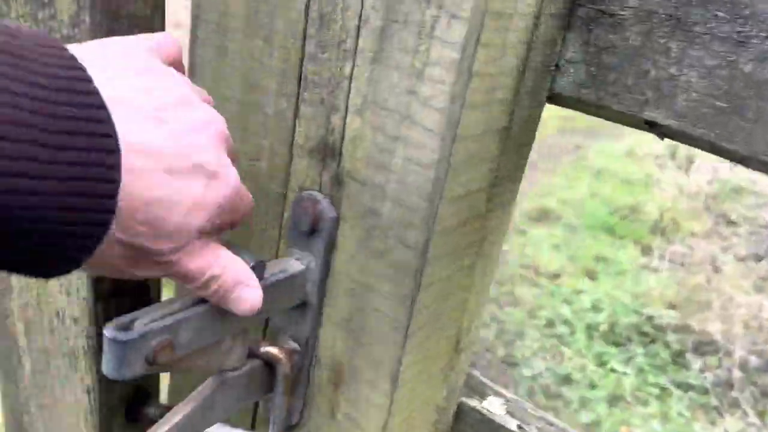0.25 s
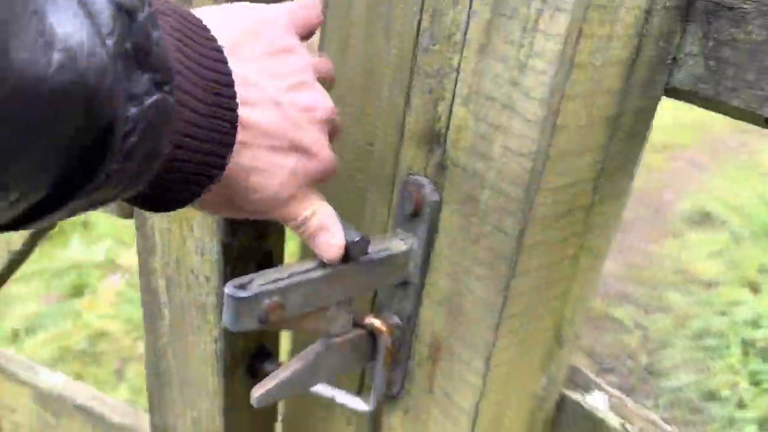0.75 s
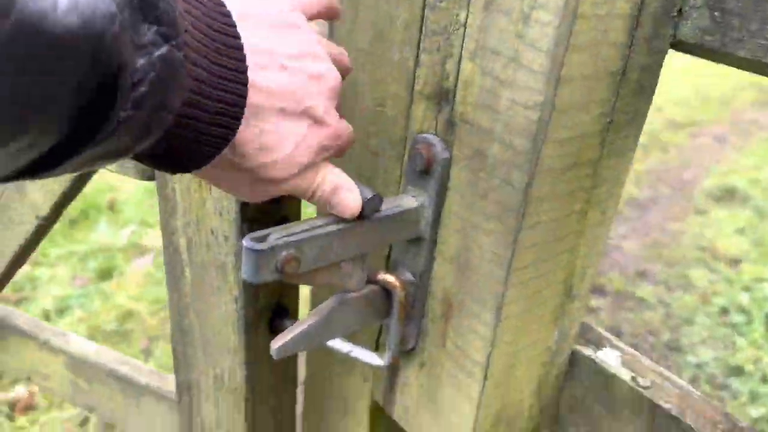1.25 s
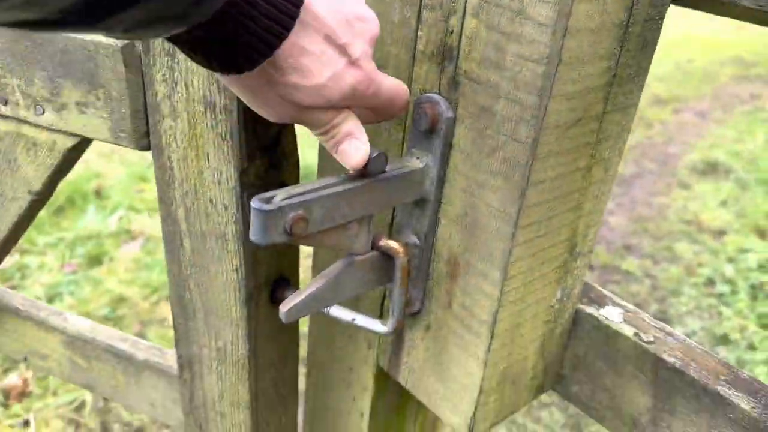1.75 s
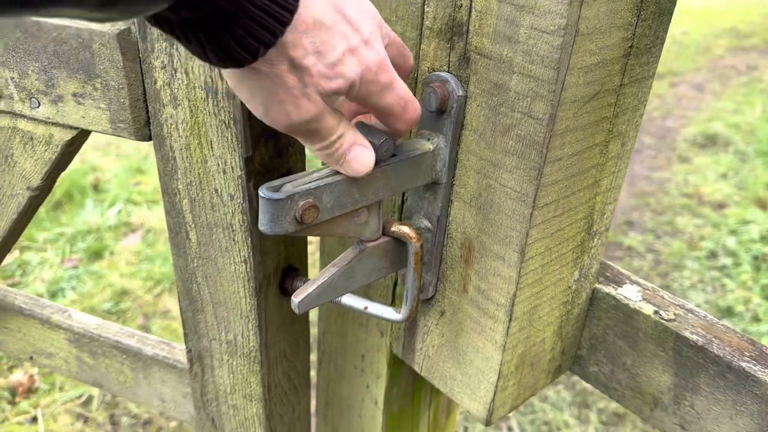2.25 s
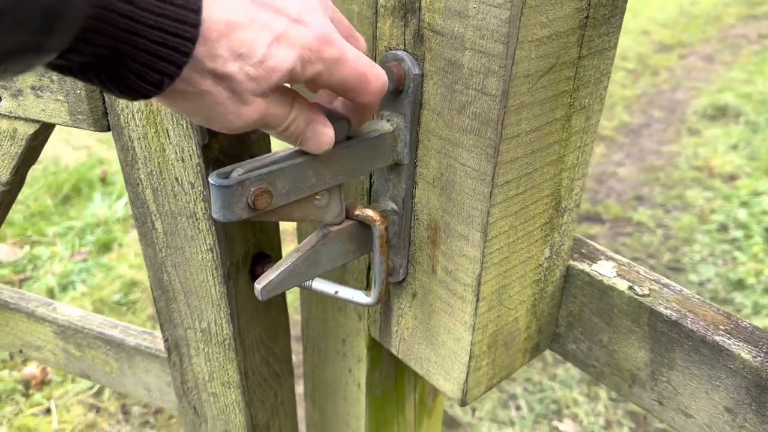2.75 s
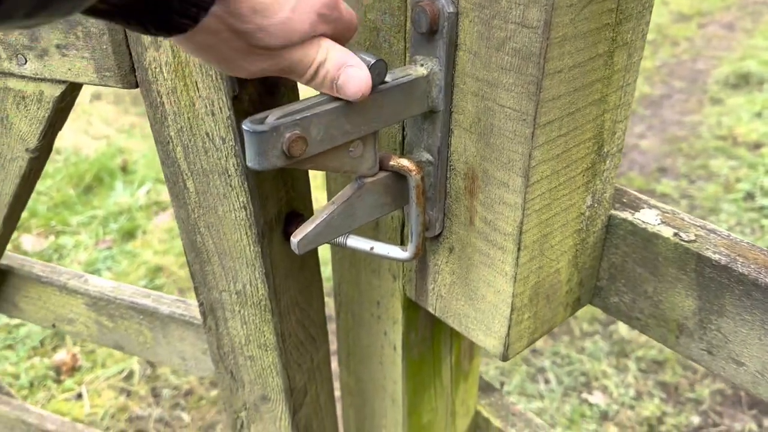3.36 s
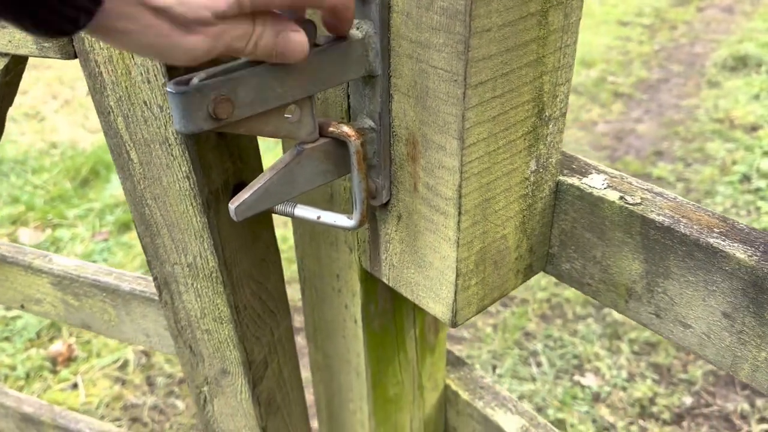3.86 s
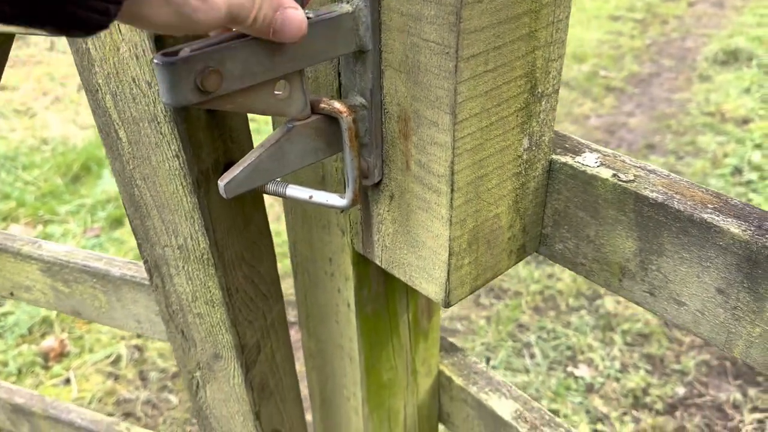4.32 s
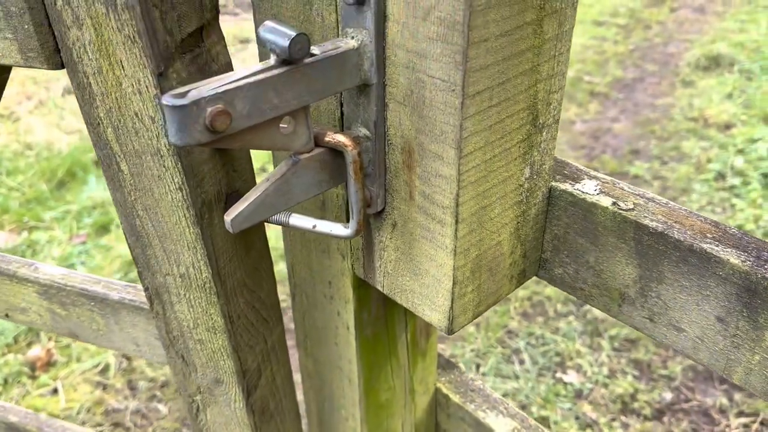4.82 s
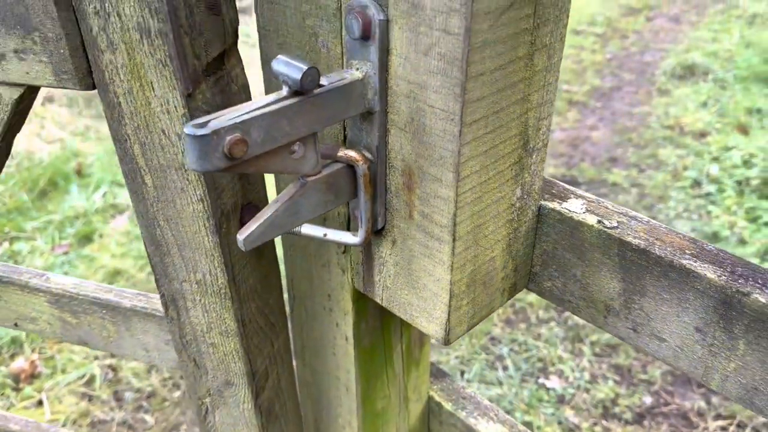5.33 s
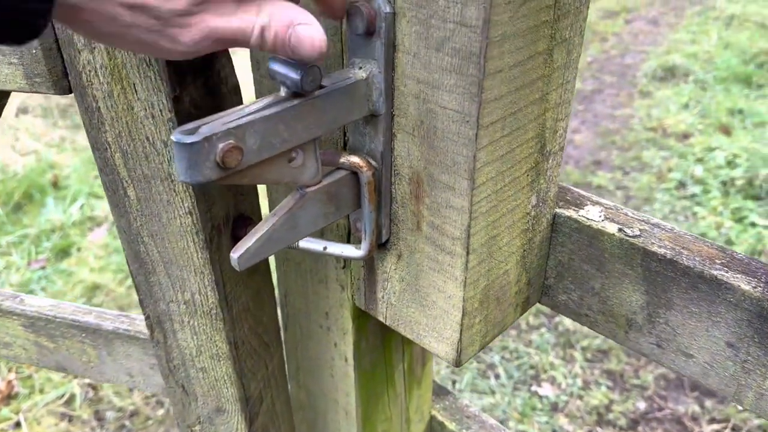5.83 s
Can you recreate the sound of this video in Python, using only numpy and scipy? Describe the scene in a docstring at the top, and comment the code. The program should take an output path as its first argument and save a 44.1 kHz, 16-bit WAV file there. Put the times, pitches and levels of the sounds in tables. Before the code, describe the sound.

A steel latch on a wooden gate is handled close to the microphone in quiet open air. A brief rub and soft knocks come at 0.1-0.3 s, with cloth brushing. After a gap, light ticks from 0.9 s lead to two strong, bright clacks at about 1.2 and 1.3 s. A faint scrape ends in a woody knock at 1.6 s. Clusters of clacks follow at 2.1 and 2.4 s, a hard one at 2.8 s, smaller clicks around 2.9-3.1 s and a ringing clank at 3.3 s. Softer ticks continue, with a pair near 4.0 s and a sharp, bright clack at 4.4 s. Dull low bumps at 4.65 and 4.9 s precede a swelling scrape, and at 5.05-5.25 s the gate shuts with a rapid, ringing rattle. Clicks at 5.7 and 5.8 s and a final firm clack at 6.0 s end it over low rumble and faint rustle.

```python
"""A wooden field gate in the open air, close by, where a hand works the steel latch.
Lever and catch clack as short modes and noise, with longer notes where they ring free; near the end the gate swings
shut and the catch rattles. Steel rubs as band noise pressed harder until it seats, bumps are decaying low sines,
the sleeve is swelling noise, and a lumpy low rumble with a rustle lies behind."""
import sys
import numpy as np
from scipy import signal
from scipy.io import wavfile
from scipy.ndimage import uniform_filter1d

SR = 44100
rng = np.random.default_rng(int(sys.argv[2]) if len(sys.argv) > 2 else 0)


def wrap_up_sound(samples):
    """Save the sound to the file named by the first command line argument, as 16-bit audio."""
    columns = np.atleast_2d(samples).T
    # keep every value between -1 and 1, then stretch to whole-number steps
    tamed = np.clip(columns, -1, 1)
    steps = np.round(tamed * 32767).astype(np.int16)
    wavfile.write(sys.argv[1], SR, steps)


N = 268348
AGE = np.arange(int(.36 * SR)) / SR  # time since a blow [s]
TOP_BAND_HZ = (12000, 16000)

# steel meeting steel: (time [s], clank level [dB], then relative to the clank: thud of the wood [dB],
# hardness of the contact [dB], free ring [dB]; pitch of the struck spot [Hz], strongest note of the free ring [Hz])
BLOWS = [(0.166, -37, -6, -7.5, -35, 1920, 6087), (0.207, -32.5, -1, -26, -30, 1160, 6087),
         (0.32, -43.5, -4, -34, -25, 1580, 6087), (0.937, -44, -9, -14.5, -20, 1270, 3461),
         (1.027, -37.5, -11.5, -25, -16.5, 1380, 3461), (1.141, -50.5, -5, -13, -24, 1270, 6087),
         (1.1717, -18.5, -23, -5, -27, 1360, 6087), (1.27, -20, -19.5, -4.5, -18, 1350, 3461),
         (1.5877, -32.5, 4, -18.5, -18, 720, 3461), (1.8366, -45.5, -0.5, -14.5, -29, 2010, 1061),
         (2.0852, -39.5, 3.5, -1.5, -14, 804, 6087), (2.109, -21.5, -9, -11, -26, 1990, 3461),
         (2.123, -31.5, -5, -22, -11, 2210, 6790), (2.188, -53.5, -4, -26, -15, 1130, 3461),
         (2.4012, -27.5, -8.5, 5, -23, 2570, 9270), (2.431, -21, -3, -7.5, -31, 2100, 1061),
         (2.4715, -32, -11, -17, -24, 2420, 1061), (2.64, -40.5, 4, -15.5, -20, 800, 1061),
         (2.801, -36, -7, -10, -21.5, 1490, 6087), (2.81, -18, -10, -5, -12, 1367, 1061),
         (2.9127, -25.5, -6, -9, -17, 1067, 3461), (2.967, -31, -13, -3.5, -4, 1390, 3461),
         (3.023, -53, 2, -7, -20, 1480, 3461), (3.1268, -26, -5, -20, -13, 800, 4318),
         (3.3024, -20, -7.5, -8, -18, 800, 4318), (3.4101, -32.5, -7.5, -7, -17, 1400, 6087),
         (3.485, -40.5, -4, -16, -27, 1380, 6087), (3.858, -41, 5, -8, -21, 638, 1061),
         (3.968, -29.5, -1.5, -21, -32, 2900, 1061), (3.9709, -26, -10.5, 0, -24, 1390, 6087),
         (4.015, -41, -2, -9, -30, 1410, 1061), (4.1915, -42.5, -2.5, -4, -11, 2650, 3461),
         (4.322, -42.5, 2.5, -6.5, -23, 930, 1061), (4.3919, -18, -25, -2, -18, 2100, 4895),
         (4.4015, -26, -1, -41, -13, 1620, 1061), (4.458, -29, -7, -17.5, -14.5, 1070, 4895),
         (4.513, -50.5, -12, -12, -20, 1420, 6087), (4.8336, -33, -3, -15.5, -26, 843, 1061),
         (5.047, -21, -5, -4, -28, 536, 3461), (5.05, -20.5, -8, -4, -13, 1980, 6087),
         (5.063, -32, -24, -2, 2.5, 1560, 3461), (5.077, -38.5, -3, 3.5, -4, 2140, 6790),
         (5.095, -36, -13, -7, -21, 1380, 3461), (5.115, -30.5, -12, -1, -1, 1400, 4895),
         (5.132, -45, -18, 3.5, 6, 2990, 6087), (5.1552, -29, -2, -6.5, 1, 800, 6087),
         (5.18, -27, -33, -4.5, -6, 1400, 6087), (5.1998, -31, -13, -18, -16, 1970, 3461),
         (5.22, -43, -12, -10.5, -22, 2010, 6790), (5.25, -41, -2, -15, -9, 1890, 6790),
         (5.689, -23, -11, -10.5, -13, 2010, 4895), (5.797, -20, -20.5, -3, -8, 2415, 4895),
         (5.95, -40, -16, -9.5, -22, 1380, 6087), (5.98, -41.5, 7, -25, -18, 790, 1061),
         (5.9942, -18.5, -7.5, -5, -21, 795, 1061)]


def from_db(db):
    """Decibels to gain."""
    return 10 ** (np.asarray(db) / 20)


def rms_one(x):
    """Scale to rms 1."""
    return x / np.sqrt(np.mean(x ** 2) + 1e-20)


def at_hz(points, hz):
    """Read a curve on a log-frequency axis."""
    points_hz, values = np.transpose(points)
    return np.interp(np.log(hz), np.log(points_hz), values)


def in_time(curve):
    """Join the points of a curve by straight lines."""
    return np.interp(np.arange(N) / SR, *np.transpose(curve))


def dying(t60):
    """Exponential decay after a blow, 60 dB down after t60 seconds."""
    return np.exp(-np.log(1000) * AGE / t60)


def rising(rise_s):
    """Vibration takes a moment to spread through the metal and wood."""
    return 1 - np.exp(-(AGE / rise_s) ** 2)


def add(out, s, sound):
    """Mix a sound in at a time in seconds."""
    start = int(s * SR)
    out[:, start:start + sound.shape[-1]] += sound[..., :N - start]


def band_noise(low, high, alike, order=3):
    """Stereo noise in a band with a given left-right correlation; rms 1."""
    sos = signal.butter(order, [low, high], "band", fs=SR, output="sos")
    mid, side = signal.sosfilt(sos, rng.standard_normal((2, N)))
    left_right = np.array([[1], [-1]])
    return rms_one(np.sqrt(1 + alike) * mid + np.sqrt(1 - alike) * side * left_right)


def pad_for_tail(noise):
    """Wrap noise past the end so that the last blows can take a full length of it."""
    return np.pad(noise, ((0, 0), (0, len(AGE))), "wrap")


def drift(per_s):
    """A smooth random wander of rms 1, with per_s new targets a second."""
    knots = rng.standard_normal(1000)
    return rms_one(np.interp(np.arange(N) / SR * per_s, np.arange(len(knots)), knots))


def shaped_noise(spectrum, patchy_db):
    """Half-octave bands of noise, each flickering on its own; rms 1."""
    # likeness of the two channels: (frequency [Hz], correlation)
    likeness = [(40, .3), (100, .35), (250, .55), (1000, .4), (4000, .15), (14000, .3)]
    out = 0
    for low in 20 * 2 ** (np.arange(20) / 2):
        hz = low * 2 ** (1 / 4)  # middle of the band
        if spectrum[0][0] <= hz <= spectrum[-1][0]:
            level_db = at_hz(spectrum, hz) + patchy_db * drift(per_s=51)
            gain = from_db(level_db) * np.sqrt(hz)  # a wider band holds more power
            out = out + gain * band_noise(low, low * np.sqrt(2), at_hz(likeness, hz), order=2)
    return rms_one(out)


def closeness(hz, spot_hz):
    """1 for a mode at the favoured pitch, falling to nearly 0 two semitones away."""
    return np.exp(-(np.log2(hz / spot_hz) / .09) ** 2)


def strike(modes, spot_hz, spot_db=0, even_total=True):
    """One stereo ring per blow: damped modes near a favoured pitch gain level, and no two blows are quite alike."""
    # how far the left channel leads the right: (frequency [Hz], phase [rad])
    lead = [(200, 0), (800, .4), (1060, -1.2), (1380, -2.5), (1750, -.4), (2100, .4), (2760, 1.1),
            (4300, 1.1), (4900, -1.4), (6080, .9), (6800, 1.2), (7800, -1.5), (9000, -1.1), (16000, -.9)]
    hz, level_db, t60, pan_db = np.transpose(modes)
    near = closeness(hz, spot_hz[:, None])
    chance_db = 2.6 * rng.standard_normal(near.shape)
    size = from_db(level_db + spot_db * near + chance_db)
    if even_total:  # the same total power in every blow
        size = size / np.linalg.norm(size, axis=1, keepdims=True)
    size = np.sqrt(2) * size * np.exp(2j * np.pi * rng.random(size.shape))  # random phases
    pan = from_db(np.outer([1, -1], pan_db) / 2)
    phase = np.exp(1j * np.outer([1, -1], at_hz(lead, hz)) / 2)
    waves = np.exp(np.outer(2j * np.pi * hz - np.log(1000) / t60, AGE))
    strengths = (size[:, None] * pan * phase).reshape(-1, len(hz))
    return (strengths @ waves).real.reshape(len(BLOWS), 2, -1)


def chatter(gaps, t60, first_db=-22, loss_db=6):
    """Envelope of a contact and of the ever weaker rebounds of the loose parts, which add in power."""
    touches = np.zeros(len(AGE))
    at = np.minimum(np.cumsum(gaps) * SR, len(AGE) - 1).astype(int)
    touches[at] = from_db(first_db - loss_db * np.arange(len(gaps))) ** 2
    decay_per_sample = dying(t60)[1] ** 2
    rebounds = np.sqrt(signal.lfilter([1], [1, -decay_per_sample], touches + 1e-18))
    return np.hypot(dying(t60), uniform_filter1d(rebounds, size=64))


def clacks(tail_t60=0.2, grain_db=1.5, lead_in_db=-15, lead_in_t60=0.023, grip_t60=0.16, struck_db=2.5, spot_db=13):
    """Each band answers a blow with clear modes, dense scatter and a faint tail from gate and ground; the struck one
    is louder, low ones follow mostly the thud of the wood and high ones the hardness."""
    # parts of a clack: (low edge [Hz], high edge [Hz], relative level [dB], share of the thud, share of the hardness,
    # scatter over clear modes [dB], rise [s], base t60 [s], tail [dB], left-right correlation)
    parts = [(1094, 3000, -1.5, 0.027, 0.013, -0.5, .0007, 0.027, -31, 0.36),
             (224, 560, -8, 0.62, 0.14, -6, 0.0021, 0.14, -17, 0.39),
             (534.9, 1100, -.5, 0.99, 0.051, -7.5, 0.0018, 0.064, -16.5, 0.57),
             (2852, 5500, -3, 0.17, 0.71, 7, 0.0002, .025, -39.5, 0.082),
             (5700, 7140, 1, 0.022, 1.03, -2.5, 0.00072, .027, -34.5, .35),
             (7777, 9430, 2, 0.0098, 1.57, 0.5, 0.00059, 0.031, -44.5, 0.26)]
    # damped modes of latch and post: (frequency [Hz], relative level [dB], t60 before grip [s], left over right [dB])
    body_modes = [(255, 0, .09, 0), (380, -4, .07, -1), (535, -1, .06, 0), (655, -5, .06, -3),
                  (725, -1, .055, -3), (800, 0, .07, -3), (940, -7, .05, -4), (1060, -5, .09, -3),
                  (1255, -4, .06, 1), (1400, -4, .06, 1), (1565, -3, .06, -1), (1820, -3, .05, -1),
                  (2010, -2, .055, -1), (2270, -2, .05, 0), (2560, -4, .04, 0), (2830, -4, .04, 1),
                  (3462, 0, .08, 2), (3800, -5, .04, 3), (4318, -2, .06, 4), (4892, -5, .05, 4),
                  (6080, 0, .055, 6), (6200, -9, .035, 4), (6830, -11, .055, 2), (7790, -6, .045, 1),
                  (8300, -8, .025, 1), (9010, 0, .036, 0), (9280, -6, .04, 0)]
    rebounds, rebound_s = 3, 0.0076  # touches after each blow, mean gap
    mean_blow_db, longer_per_db = -27.5, 0.0011  # firmer blows last very slightly longer
    attack, lead = int(.016 * SR), int(.012 * SR)
    out = np.zeros((2, N))
    gaps = rebound_s * rng.uniform(.4, 1.6, (len(BLOWS), rebounds))
    *_, spots_hz, _ = np.transpose(BLOWS)
    grip = dying(grip_t60)  # hand and bolts damp the clear modes
    # a few milliseconds of noise swell into each blow
    lead_in = from_db(lead_in_db) * dying(lead_in_t60)[:lead][::-1] * np.linspace(0, 1, lead)
    for low, high, part_db, thud_share, hard_share, scatter_db, rise_s, t60, tail_db, alike in parts:
        modes = [mode for mode in body_modes if low <= mode[0] < high]
        rings = strike(modes, spots_hz, spot_db=spot_db)
        scatter = pad_for_tail(band_noise(low, high, alike) * from_db(grain_db * drift(per_s=95)))
        tail, rise = from_db(tail_db) * dying(tail_t60), rising(rise_s)
        for (s, clank_db, thud_db, hard_db, _, spot_hz, _), ring, gap in zip(BLOWS, rings, gaps):
            start = int(s * SR)
            struck = low <= spot_hz < high
            level_db = clank_db + part_db + thud_share * thud_db + hard_share * hard_db + struck_db * struck
            contact = chatter(gap, t60 * np.exp(longer_per_db * (clank_db - mean_blow_db)))
            dense = from_db(scatter_db) * (contact + tail) * scatter[:, start:start + len(AGE)]
            sound = rise * (dense + grip * ring)
            attack_rms = np.sqrt(np.mean(sound[:, :attack] ** 2))
            add(out, s, from_db(level_db) * sound / attack_rms)
            add(out, s - lead / SR, from_db(level_db) * lead_in * scatter[:, start - lead:start])
    return out


def sparkle(crack_db=-7, crack_t60=0.016, modes_db=-2, full_db=-25, steepness=1.5):
    """Strong, hard contacts reach into the top of the treble, with a brief noise crack and a few high modes."""
    # the highest modes: (frequency [Hz], relative level [dB], t60 [s], left over right [dB])
    top_modes = [(11900, -16, .04, 0), (12500, -16, .03, 0), (13050, -14, .035, 0), (13800, -14, .025, 0),
                 (14300, -8, .03, 0), (14900, -13, .025, 0), (15600, -9, .03, 0)]
    out = np.zeros((2, N))
    crack = pad_for_tail(band_noise(*TOP_BAND_HZ, .45))
    *_, spots_hz, _ = np.transpose(BLOWS)
    rings = strike(top_modes, spots_hz, even_total=False)
    for (s, clank_db, _, hard_db, *_), ring in zip(BLOWS, rings):
        start, sharp_db = int(s * SR), clank_db + hard_db
        snap = from_db(crack_db) * dying(crack_t60) * crack[:, start:start + len(AGE)]
        level_db = full_db + steepness * (sharp_db - full_db)  # treble grows faster than the blow
        add(out, s, from_db(level_db) * rising(.0004) * (from_db(modes_db) * ring + snap))
    return out


def free_ringing(note_db=11, ring_db=-0.5):
    """Where the hand lets go, the modes of catch and lever ring on after the clack, one note favoured."""
    # free ringing of catch and lever: (frequency [Hz], relative level [dB], t60 [s], left over right [dB])
    free_modes = [(1061, -4, .1, -3), (1430, -11, .08, 1), (2090, -6, .06, -1), (3461, -3, .13, 2),
                  (4318, -8, .17, 3), (4895, -8, .18, 3), (6087, -1, .13, 5), (6790, -5, .15, 2),
                  (7795, -11, .1, 1), (9270, -12, .1, 0), (11900, -24, .1, 0), (13070, -18, .12, 0)]
    out = np.zeros((2, N))
    *_, notes_hz = np.transpose(BLOWS)
    rings = strike(free_modes, notes_hz, spot_db=note_db)
    for (s, clank_db, _, _, free_db, *_), ring in zip(BLOWS, rings):
        add(out, s, from_db(clank_db + free_db + ring_db) * rising(0.00038) * ring)
    return out


def slides(swell_db=14, slip_db=3.5):
    """Rusty faces stick and slip: flickering noise in the latch's resonances swells as the steel is pressed harder."""
    # steel rubbing along steel until it seats: (start [s], end [s], final level [dB])
    strokes = [(0.099, 0.156, -42.5), (1.494, 1.583, -49), (2.784, 2.799, -42), (2.899, 2.911, -36.5),
               (3.287, 3.295, -40.5), (5.009, 5.05, -30), (5.966, 5.99, -42)]
    # resonances that the rubbing sings in: (frequency [Hz], width [Hz], relative level [dB])
    rubbed = [(932, 95, 0), (1450, 440, -3.5), (2050, 120, -5), (2940, 1400, -11), (6130, 1500, -11.5)]
    t = np.arange(N) / SR
    pressure = np.zeros(N)
    for start, end, level_db in strokes:
        approach = np.clip((t - end) / (end - start), -1, 0)  # -1 at the start, 0 when seated
        pressure += ((t > start) & (t < end)) * from_db(level_db + swell_db * approach)
    rub = np.zeros((2, N))
    for hz, width, level_db in rubbed:
        rub += from_db(level_db) * band_noise(hz - width / 2, hz + width / 2, 0.19, order=1)
    return pressure * rms_one(rub * from_db(slip_db * drift(per_s=150)))


def bumps(rise_s=0.0018, gain_db=3):
    """Soft pushes of gate and hand each give a few cycles of a low decaying sine."""
    # dull bumps: (time [s], relative level [dB], pitch [Hz], t60 [s])
    pushes = [(0.137, -31, 84, 0.068), (4.077, -27.5, 86.4, 0.099), (4.242, -32, 224, 0.061),
              (4.325, -23, 114, 0.03), (4.654, -27.5, 192.6, 0.034), (4.928, -14, 104, 0.033),
              (5.05, -23.5, 204, 0.067), (5.066, -27, 95.7, 0.32), (5.345, -29, 130, 0.058)]
    out = np.zeros((2, N))
    for s, level_db, hz, t60 in pushes:
        tone = np.sin(2 * np.pi * hz * AGE)
        add(out, s, from_db(level_db + gain_db) * rising(rise_s) * dying(t60) * tone)
    return out


def sleeve(hiss_db=1, top_hiss_db=-10, skew=0.48):
    """Each move of the arm swells cloth noise quickly and fades it over a faint hiss; a faint high hiss swells
    together with the cloth noise."""
    # the sleeve brushes as the arm moves: (start [s], length [s], relative level [dB])
    swishes = [(0.032, 0.53, -55), (0.881, 0.09, -57), (1.102, 0.18, -56.5), (1.986, 0.098, -62.5),
               (2.87, 0.25, -56), (3.32, 0.14, -53), (3.84, .15, -57), (4.679, 0.21, -49.5),
               (4.97, .14, -56)]
    # faint hiss beneath: (time [s], relative level [dB])
    hiss = [(0, -57), (.6, -65.5), (1.4, -61.5), (1.83, -76.5), (2.3, -61.5), (3.15, -64), (3.65, -57.5),
            (4.1, -61), (5.2, -60.5), (6.08, -62.5)]
    # colour of cloth and hiss: (frequency [Hz], relative density [dB per Hz])
    cloth_spectrum = [(400, -8.5), (1000, 13), (2000, 6), (3500, 1.5), (5000, 7), (6500, 6.5), (9000, -1),
                      (11000, -29.5), (14500, -27.5), (17000, -24)]
    t = np.arange(N) / SR
    brush = np.zeros(N)
    for s, length, level_db in swishes:
        progress = np.clip((t - s) / length, 0, 1)
        brush += from_db(level_db) * np.sin(np.pi * progress ** skew)
    top_hiss = from_db(top_hiss_db) * brush * band_noise(*TOP_BAND_HZ, 0.24)
    level = from_db(hiss_db) * np.hypot(brush, from_db(in_time(hiss)))
    return level * shaped_noise(cloth_spectrum, patchy_db=3.5) + top_hiss


def background(rumble_db=4, rustle_db=-54.5, rustle_follows=0.54, lumpy_db=1.0):
    """Low, lumpy outdoor rumble of shaped noise, and a rustle that rises and falls with it."""
    # course of the outdoor rumble: (time [s], relative level [dB])
    air = [(0.0, -48.5), (0.51, -51.5), (0.86, -50.5), (1.83, -47.5), (2.45, -55), (3.01, -50),
           (3.88, -50.5), (4.21, -46), (4.69, -45.5), (5.25, -40), (5.45, -48.5), (6.08, -50.5)]
    # colour of the rumble: (frequency [Hz], relative density [dB per Hz])
    rumble_spectrum = [(20, -39.5), (35, -13), (50, 1), (68, 2.5), (100, -3.5), (140, -12.5), (220, -32.5),
                       (400, -50.5)]
    # colour of the rustle: (frequency [Hz], relative density [dB per Hz])
    rustle_spectrum = [(90, -18.5), (150, 3.5), (220, -1), (330, -9), (500, -9), (1000, -14), (2000, -22.5),
                       (4000, -32.5)]
    air_db = in_time(air)
    rumble_level = from_db(air_db + rumble_db + lumpy_db * drift(per_s=14))
    rustle_level = from_db(rustle_db + rustle_follows * (air_db - air_db.mean()))
    rumble = rumble_level * shaped_noise(rumble_spectrum, patchy_db=0.5)
    return rumble + rustle_level * shaped_noise(rustle_spectrum, patchy_db=1.5)


def scene():
    """The latch close in front, the open air around it."""
    return clacks() + sparkle() + free_ringing() + slides() + bumps() + sleeve() + background()


def record(dry, low_cut_hz=36, dip_hz=11000, dip_width_hz=2200, top_stop_hz=17400):
    """The deepest bass is taken away; the sound is thinned around 11 kHz, peaks are rounded, the top is cut."""
    heard = signal.sosfilt(signal.butter(3, low_cut_hz, "high", fs=SR, output="sos"), dry)
    heard = signal.lfilter(*signal.iirnotch(dip_hz, dip_hz / dip_width_hz, fs=SR), heard)
    rounded = np.tanh(heard)
    return signal.sosfilt(signal.cheby2(14, 70, top_stop_hz, fs=SR, output="sos"), rounded)


dry = scene()
out = record(dry)
wrap_up_sound(out)
```